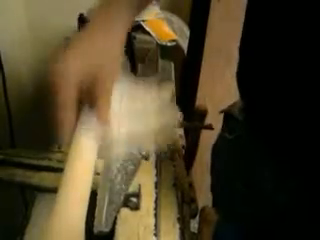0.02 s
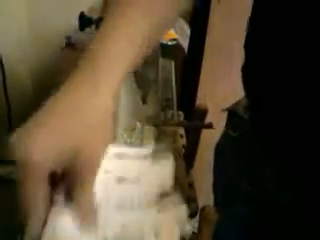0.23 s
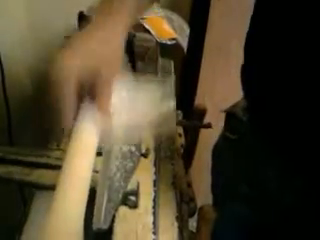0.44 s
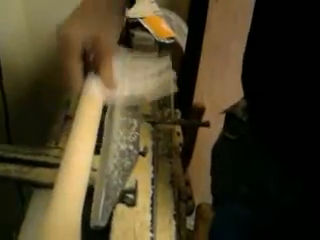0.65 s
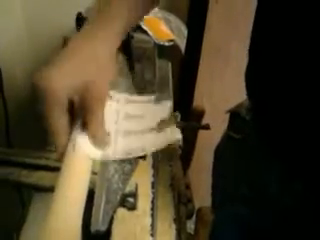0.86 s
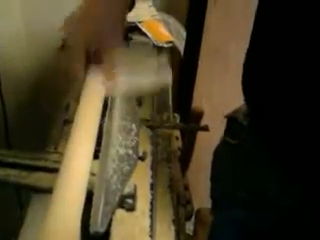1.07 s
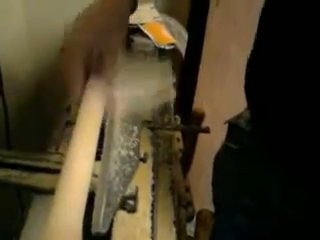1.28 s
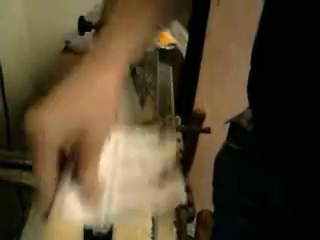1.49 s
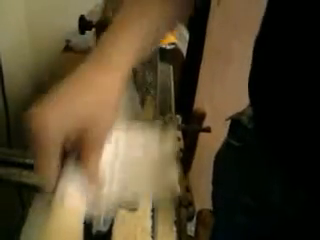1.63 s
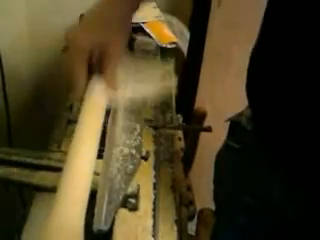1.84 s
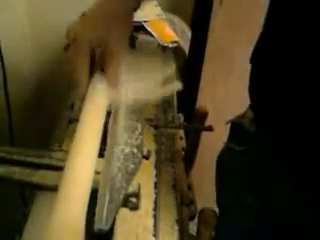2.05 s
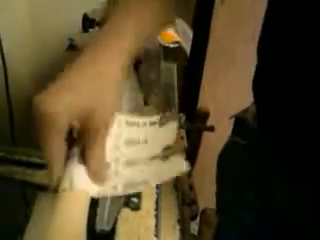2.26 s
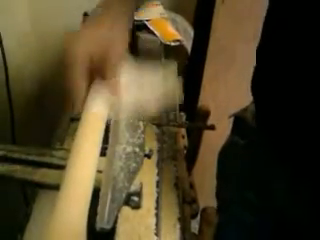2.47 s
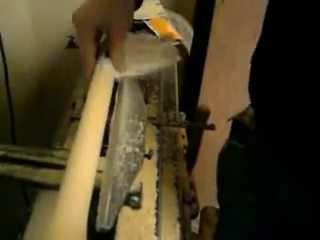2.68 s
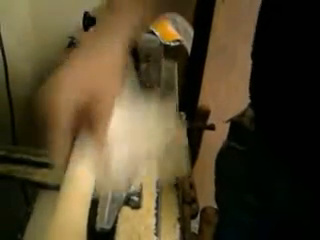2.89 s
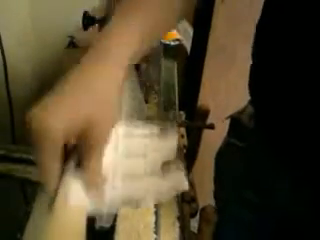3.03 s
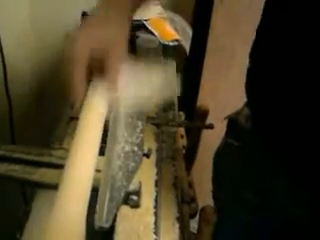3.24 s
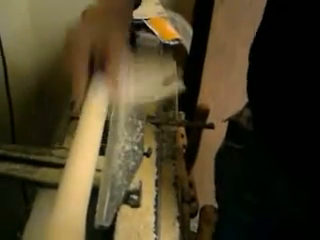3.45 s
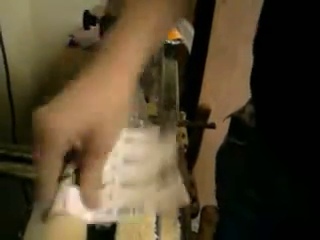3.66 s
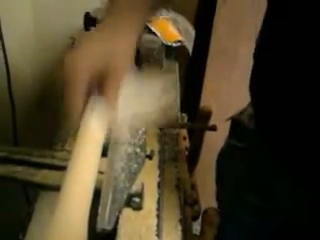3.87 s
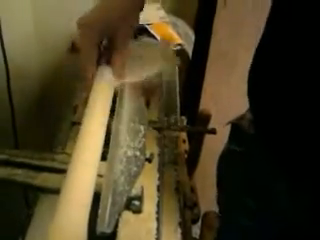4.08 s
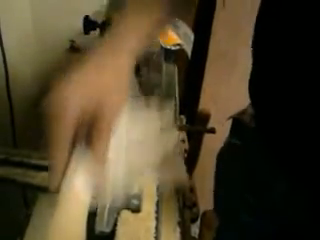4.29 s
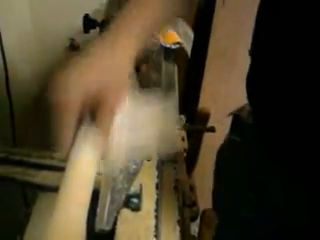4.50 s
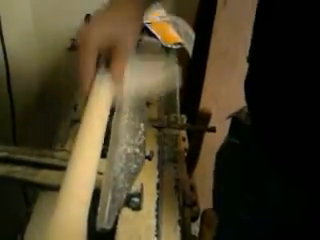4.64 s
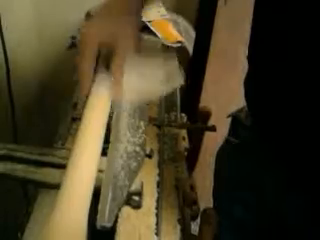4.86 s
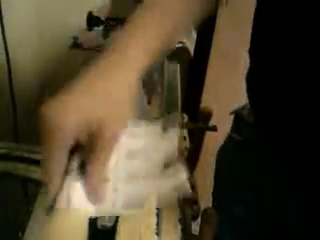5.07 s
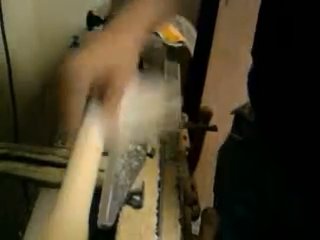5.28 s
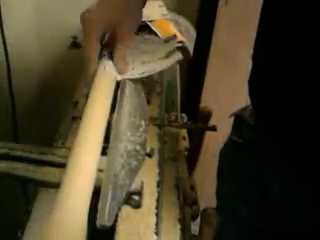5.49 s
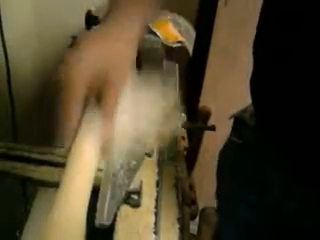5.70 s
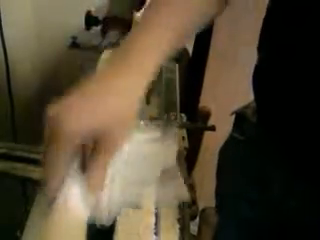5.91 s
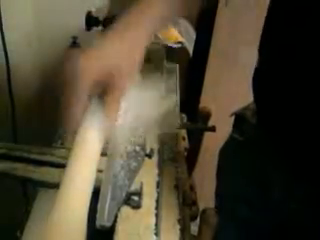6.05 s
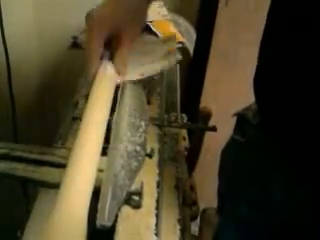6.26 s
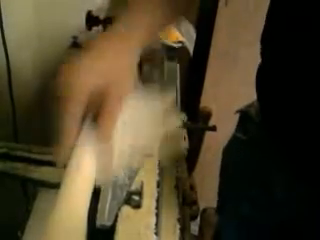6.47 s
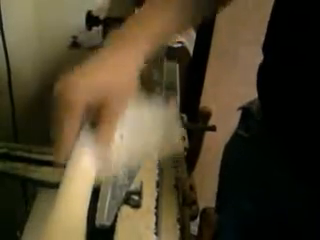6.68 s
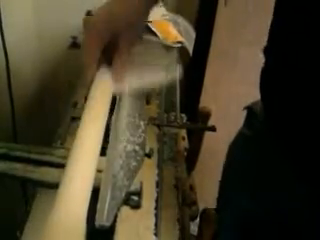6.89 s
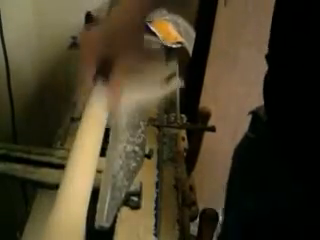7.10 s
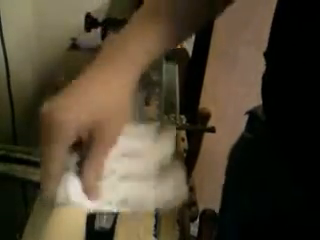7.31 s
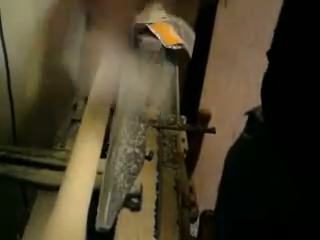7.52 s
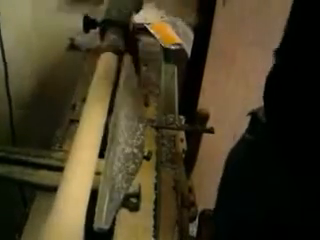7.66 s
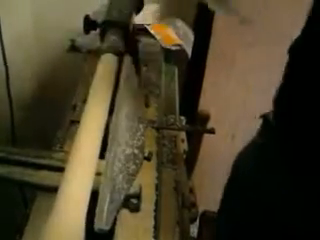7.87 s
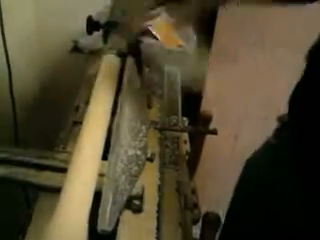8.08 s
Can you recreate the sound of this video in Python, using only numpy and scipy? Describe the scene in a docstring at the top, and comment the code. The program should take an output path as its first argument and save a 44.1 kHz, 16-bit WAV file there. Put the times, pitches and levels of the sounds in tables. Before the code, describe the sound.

Close, gritty sanding hiss with a papery nasal ring surges over a lathe's hum, ending in a hard clattering switch-off and fading whirr.

```python
"""A hand slides abrasive paper along a wooden spindle spinning in a lathe, close to a small phone-grade recorder.
From the start, filtered noise makes the grit's hiss and the ring of paper and wood near 2 kHz, pass by pass.
Short tones mark the snags; below them noise makes the whirr and the bed's rumble, a sine the motor's whine.
Near the end the paper lifts, then the switch clunks in a volley of short bursts that rattle the casing.
The whine stops there, and the rest fades as the lathe coasts."""
import sys
import numpy as np
from scipy import signal
from scipy.fft import rfft, irfft
from scipy.io import wavfile
from scipy.ndimage import uniform_filter1d

SR = 44100
rng = np.random.default_rng(int(sys.argv[2]) if len(sys.argv) > 2 else 0)


def generate_wav(sig):
    """Save sig (samples, or channels by samples) to the path in sys.argv[1] as 16-bit PCM at SR."""
    pcm = np.round(np.clip(np.atleast_2d(sig).T, -1, 1) * 32767).astype(np.int16)
    wavfile.write(sys.argv[1], SR, pcm)


N = 358974
TIME = np.arange(N) / SR  # seconds
OFF_S = 7.35  # the motor is switched off

# Passes of the hand, pressing the paper in and easing off; each level is a change at the peak of the pass:
# [t/s of most pressure, length/s, hiss level/dB, ring level/dB, whirr level/dB, ring f/Hz]
PASSES = [(.2, 0.42, 7, 3, 2, 1990), (.55, 0.18, 0.5, 3, -0.5, 1817), (.82, .2, 2, 4.5, -0.5, 1974),
          (1.06, 0.35, 2.5, 7, -1, 1912), (1.5, 0.62, 3, 2, 1.5, 1882), (1.93, 0.33, -0.5, 4.5, 1, 1886),
          (2.3, 0.45, 2, 0.5, 0.5, 1920), (2.62, 0.21, 3.5, 6.5, 2, 1970), (2.97, 0.24, 4, -1, 2, 1924),
          (3.2, 0.4, 2.5, 4.5, 0, 1896), (3.66, 0.36, 4, 3, 3, 1993), (4.0, 0.24, 3, 8.5, 3, 1914),
          (4.35, 0.28, 2.5, 1, 1.5, 1910), (4.7, 0.28, 1.5, 10, 1.5, 1923), (5.1, .2, 1, -1.5, -0.5, 1930),
          (5.46, .24, 3.5, 10, 2, 1864), (5.85, 0.32, 4, 4.5, -0.5, 1973), (6.22, 0.09, -3, 10, 1.5, 1933),
          (6.58, 0.25, -0.5, -1, 2, 1916), (6.94, 0.22, 2, 4.5, 5, 1967), (7.2, 0.24, 0.5, -1.5, -1, 1955)]


def pressure(column):
    """Sum of one smooth swell per pass, scaled by the chosen column (dB)."""
    t = TIME[::100]  # a coarse clock is enough for slow swells
    total_db = np.zeros(len(t))
    for row in PASSES:
        peak_s, length_s = row[:2]
        from_peak = (t - peak_s) / (length_s / 2)
        total_db += row[column] * np.exp(-np.log(16) * from_peak ** 2)  # 1/16 left at half a length
    return np.interp(TIME, t, total_db)


# How loud the tearing grit is at each pitch: [f/Hz, relative level/dB per Hz]
GRIT_SPECTRUM = [(900, -42), (1400, -18), (1550, -11.5), (1930, -2), (2250, -3.5), (3050, -5.5), (3310, -5),
                 (4000, -8.5)]
HISS_DB, RING_DB = -23.5, -28  # levels between passes
LIFT_S, LIFT_TAKES_S = 7.27, .07  # the paper starts to lift; seconds it takes to leave
HISS_DROP_DB, RING_DROP_DB = -12, -14  # what lifting takes away; a faint hiss of the spinning work stays
SPIN_HZ = 32.7  # average spindle turns a second


def sanding():
    """Grit tears fibres; the contact grabs unevenly and once a turn, and the held paper rings."""
    lifted = np.clip((TIME - LIFT_S) / LIFT_TAKES_S, 0, 1)
    hiss_db = HISS_DB + pressure(column=2) + HISS_DROP_DB * lifted + coasting()
    ring_db = RING_DB + pressure(column=3) + RING_DROP_DB * lifted + coasting()
    ring_hz = np.interp(TIME, [row[0] for row in PASSES], [row[-1] for row in PASSES])

    spin_hz = SPIN_HZ * (1 + .04 * flutter(5.3))
    turn = np.cos(2 * np.pi * np.cumsum(spin_hz) / SR)
    grab = flutter(90)
    hiss = noise(GRIT_SPECTRUM, patchy_db=2.0) * gain_of(hiss_db + 0.6 * turn + 0.95 * grab)

    scratch_db = 1.4 * turn + 0.17 * grab + 1.0 * flutter(130)
    scratch = rng.standard_normal(N) * gain_of(scratch_db)
    wander_hz = ring_hz + 70 * flutter(25)  # the grip shifts the pitch
    ring = resonate(resonate(scratch, wander_hz, 240), wander_hz, 270)
    return hiss + evened(ring) * gain_of(ring_db + 1.1 * flutter(14))


# Moments when the paper catches and chatters: [start t/s, peak level/dB, f/Hz]
SNAGS = [(.1615, -5.5, 2068), (.1938, -11, 2160), (.2022, -4.5, 2100), (.2075, -4, 2160),
         (.2274, -12, 2085), (.2684, -10, 2132), (2.6833, -6, 1910), (4.0153, -16, 1972),
         (4.6595, -11, 2042), (4.7186, -10, 2060), (5.28, -12, 1875), (5.4113, -11, 2080),
         (5.432, -12, 1925), (5.4418, -11, 1956), (5.453, -11, 1904), (5.4654, -3.5, 1867),
         (5.482, -12, 1883), (5.8004, -16, 1900)]


def catches():
    """Where the paper snags it gives a short ring, made as a 7 ms burst of tone."""
    out = np.zeros(N)
    for start_s, level_db, hz in SNAGS:
        out = burst(out, start_s, level_db, hz, length_s=.007)
    return out


# Switch and shaking bed: [start t/s, peak level/dB, f/Hz, length/s, casing rattle level/dB]
BLOWS = [(4.275, -25, 450, .02, -28), (4.535, -18, 450, .02, -21), (7.337, -18, 900, .008, -24),
         (7.3455, -1, 810, .011, -15.5), (7.364, -14, 700, .01, -24), (7.374, -9, 260, .01, -26),
         (7.393, -16, 300, .006, -32), (7.411, -24, 400, .012, -28), (7.425, -22, 600, .01, -26),
         (7.44, -21, 250, .014, -32), (7.462, -24, 250, .014, -30), (7.483, -24, 250, .016, -32),
         (7.505, -20, 300, .01, -32), (7.86, -28, 350, .04, -32)]
# What the casing rings with: [f/Hz, width/Hz, level/dB]
CASING_MODES = [(175, 16, -7), (232, 16, -3), (431, 160, -4), (800, 200, -8), (1040, 140, -2),
                (1320, 120, -8), (1900, 160, -4), (2350, 160, -6), (3350, 180, -5)]
RATTLE_T60_S = .05  # time for a rattle to drop by 60 dB
COAST_SHAKE_DB = -37  # the slowing spindle keeps the casing trembling


def knocks():
    """Each blow is a short hollow burst that also rattles the iron casing."""
    blows, jolts = np.zeros(N), np.zeros(N)
    for start_s, level_db, hz, length_s, casing_db in BLOWS:
        blows = burst(blows, start_s, level_db, hz, length_s)
        jolts[round(start_s * SR)] = gain_of(casing_db)
    loss_per_sample = gain_of(-60 / (RATTLE_T60_S * SR))
    rattle = signal.lfilter([1], [1, -loss_per_sample], jolts)
    tremble = gain_of(COAST_SHAKE_DB + coasting()) * (TIME > OFF_S)
    shake = rng.standard_normal(N) * (rattle + tremble)
    return blows + modes(shake, CASING_MODES)


# How loud the broad whirr is at each pitch: [f/Hz, relative level/dB per Hz]
WHIRR_SPECTRUM = [(290, -34), (500, -16.5), (701, 0), (730, 1), (878, -1), (1020, 2), (1380, -1.5),
                  (1700, 2.5), (2210, -27.5), (3740, -120)]
# Rings of the headstock: [f/Hz, width/Hz, level/dB against the broad whirr before switch-off]
HEADSTOCK_MODES = [(943, 55, -25.5), (1041, 35, -11.5), (1274, 69, -8)]
WHIRR_DB = -30  # level between passes
WHIRR_DROP_DB = -9  # drop of the broad part at switch-off


def whirr():
    """Bearings and belt shake the headstock: broad noise plus a few resonances."""
    level_db = WHIRR_DB + pressure(column=4) + coasting()
    level_db = level_db + 1.0 * flutter(14) + 1.1 * flutter(55)
    broad = noise(WHIRR_SPECTRUM, patchy_db=2.0) * gain_of(WHIRR_DROP_DB * (TIME > OFF_S))
    headstock = modes(rng.standard_normal(N), HEADSTOCK_MODES)
    return (broad + headstock) * gain_of(level_db)


# How loud the broad rumble is at each pitch: [f/Hz, relative level/dB per Hz]
RUMBLE_SPECTRUM = [(18, -23), (40, -12.5), (70, 0.5), (120, -1.5), (217, 3), (377, 1.5), (620, -1),
                   (810, -27)]
# Rings of the bed: [f/Hz, width/Hz, level/dB against the broad rumble]
BED_MODES = [(175, 11, -12), (232, 9, -8), (300, 14, -17), (441, 25, -13)]
# Rise and fall of the whole rumble, before its flutter: [t/s, level/dB]
RUMBLE_COURSE = [(0, -33), (.45, -33.5), (.8, -38), (1.28, -35), (1.5, -36), (1.88, -34.5), (2.3, -39),
                 (2.87, -32), (3.3, -36), (3.65, -37), (4.0, -35.5), (4.5, -33), (5.0, -34), (5.65, -36),
                 (6.03, -34), (6.3, -34.5), (6.7, -37), (7.32, -32.5), (7.42, -33.5), (7.9, -39),
                 (8.14, -49)]


def rumble():
    """Bearings and belt shake the bed: low noise plus the bed's own resonances."""
    level_db = np.interp(TIME, *np.transpose(RUMBLE_COURSE))
    bed = modes(rng.standard_normal(N), BED_MODES)
    return (noise(RUMBLE_SPECTRUM, patchy_db=2.4) + bed) * gain_of(level_db + 2.2 * flutter(13))


WHINE_HZ, WHINE_DB = 747.5, -45.5  # centre pitch and level, before the flutter


def whine():
    """The motor sings one slightly wavering sine until it is switched off."""
    hz = WHINE_HZ * (1 + .005 * flutter(6))
    tone = np.sqrt(2) * np.sin(2 * np.pi * np.cumsum(hz) / SR)
    return tone * gain_of(WHINE_DB + 2.6 * flutter(7.1)) * (TIME < OFF_S)


def coasting():
    """Fade of 4.5 dB a second after the switch-off, as the lathe slows."""
    return -4.5 * np.maximum(TIME - OFF_S, 0)


def burst(mix, start_s, level_db, hz, length_s):
    """Adds a few cycles of tone that swell and stop."""
    t = np.arange(round(length_s * SR)) / SR
    swell = np.sin(np.pi * t / length_s) ** 1.8
    sound = np.zeros(N)
    sound[round(start_s * SR):][:len(t)] = gain_of(level_db) * swell * np.sin(2 * np.pi * hz * t)
    return mix + sound


def mode(x, hz, width_hz):
    """A fixed resonance that keeps the power of white noise."""
    r = np.exp(-np.pi * width_hz / SR)
    pole = r * np.exp(2j * np.pi * hz / SR)
    return np.sqrt(2 * (1 - r ** 2)) * signal.lfilter([1], [1, -pole], x).real


def modes(shake, table):
    """One shake sets every resonance of a part ringing at its own level."""
    return sum(gain_of(db) * mode(shake, hz, width_hz) for hz, width_hz, db in table)


def resonate(x, hz, width_hz):
    """A moving resonance of gain 1: shifts the pitch curve hz down to zero, smooths, and shifts back."""
    turn = np.exp(2j * np.pi * np.cumsum(hz * np.ones(len(x))) / SR)
    r = np.exp(-np.pi * width_hz / SR)
    smooth = signal.lfilter([1 - r], [1, -r], x / turn)
    return 2 * (turn * smooth).real


def flutter(rate_hz):
    """A random curve of rms 1 that changes slowly, up to about rate_hz."""
    hz = np.fft.rfftfreq(N, 1 / SR)
    spectrum = rfft(rng.standard_normal(N)) / (1 + (hz / rate_hz) ** 4)
    return evened(irfft(spectrum, N))


def noise(spectrum, patchy_db):
    """Noise of rms 1 from random short-time spectra with drifting louder and softer patches."""
    frames, hz = N // 256 + 5, np.fft.rfftfreq(1024, 1 / SR)
    a, b, patches = rng.standard_normal((frames, 513, 3)).T
    patches = uniform_filter1d(patches, size=12, axis=0)  # across pitch
    patches = evened(uniform_filter1d(patches, size=10, axis=1))  # across time
    z = (a + 1j * b) * gain_of(read(spectrum, hz)[:, None] + patchy_db * patches)
    return evened(signal.istft(z, nperseg=1024, noverlap=768)[1][:N])


def read(points, hz):
    """Reads a table of levels (dB) at any pitch; outside its ends it is 40 dB down."""
    f, value = np.transpose(points)
    return np.interp(np.log(hz + 1), np.log(f + 1), value, left=value[0] - 40, right=value[-1] - 40)


def gain_of(db):
    """Turns decibels into a multiplier."""
    return 10 ** (np.asarray(db) / 20)


def evened(x):
    """Scales to rms 1."""
    return x / np.sqrt(np.mean(x ** 2) + 1e-20)


def low_pass(x, hz):
    """Steep filter that removes what lies above hz."""
    return signal.oaconvolve(x, signal.firwin(1023, hz, window=("kaiser", 10), fs=SR), "same")


def scene():
    """All sources together, as one channel."""
    return (sanding() + catches() + knocks() + whirr() + rumble() + whine())[None]


# Response and roll-off of microphone and converter: [f/Hz, level/dB]
RECORDER_RESPONSE = [(15, -11), (45, -2.5), (3400, 2.5), (3500, -2), (3700, -10.5), (4000, -15),
                     (4200, -24.5), (4400, -34), (4500, -39.5), (4700, -54.5)]
RATE_HZ = 8000  # of the slow converter
SLOW_EDGE_HZ, EDGE_HZ = 4650, 15900  # low-pass edges before and after clipping


def record(dry):
    """The input saturates softly; a slow converter mirrors the treble about half its rate; peaks clip into ticks."""
    size = SR * (N // SR + 1)  # whole seconds, so half the rate falls on a bin
    soft = dry[0] / (1 + (abs(dry[0]) / .66) ** 4) ** (1 / 4)
    z, hz = rfft(soft, size), np.fft.rfftfreq(size, 1 / SR)
    half = RATE_HZ // 2 * size // SR
    z[half + 1:2 * half] = np.conj(z[half - 1:0:-1])  # mirror image above half the rate
    shaped = irfft(z * gain_of(read(RECORDER_RESPONSE, hz)), size)[:N]
    narrow = low_pass(shaped, SLOW_EDGE_HZ)
    return low_pass(np.clip(narrow, -.71, .71), EDGE_HZ)[None]


dry = scene()
out = record(dry)
generate_wav(out)
```